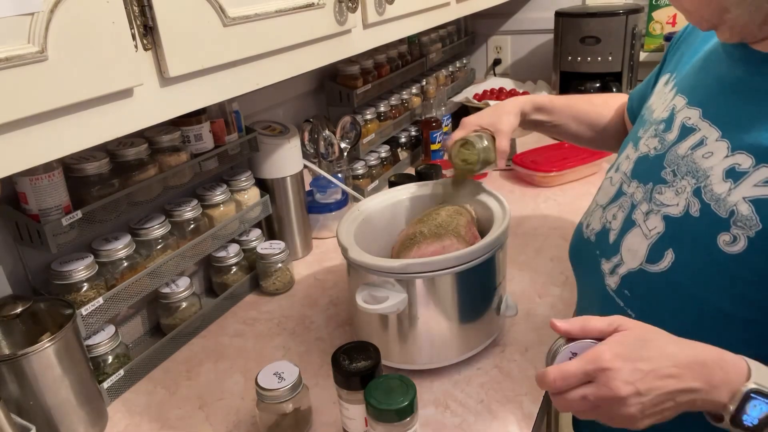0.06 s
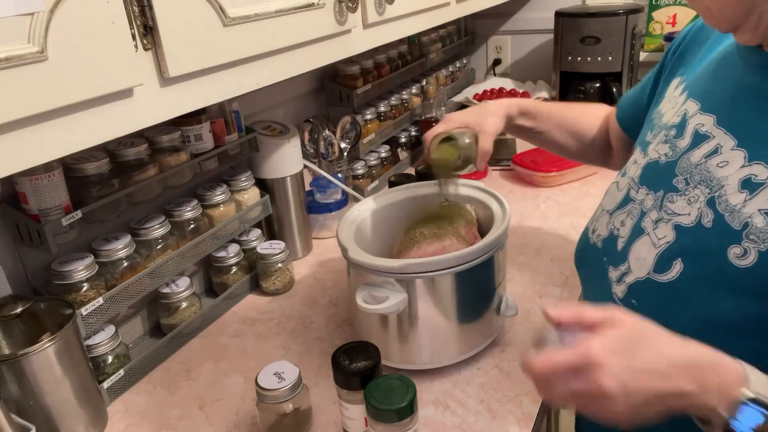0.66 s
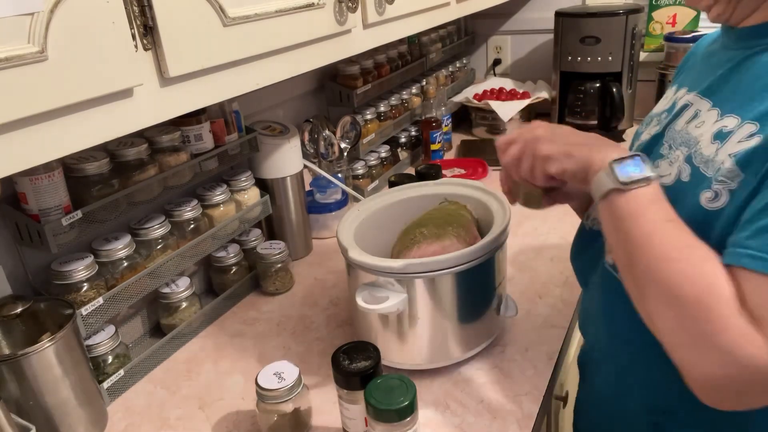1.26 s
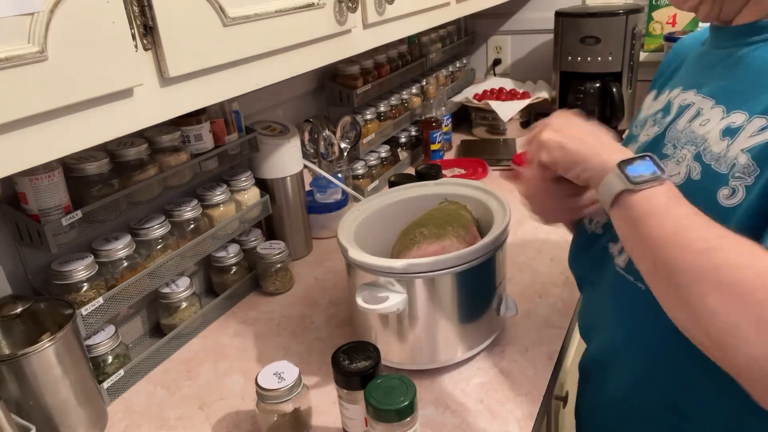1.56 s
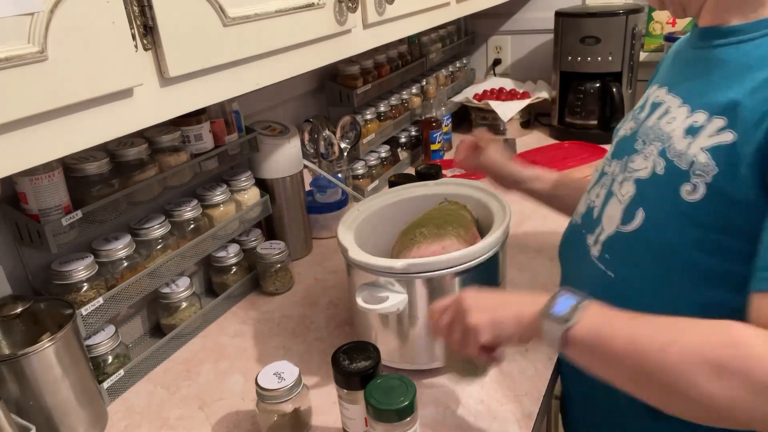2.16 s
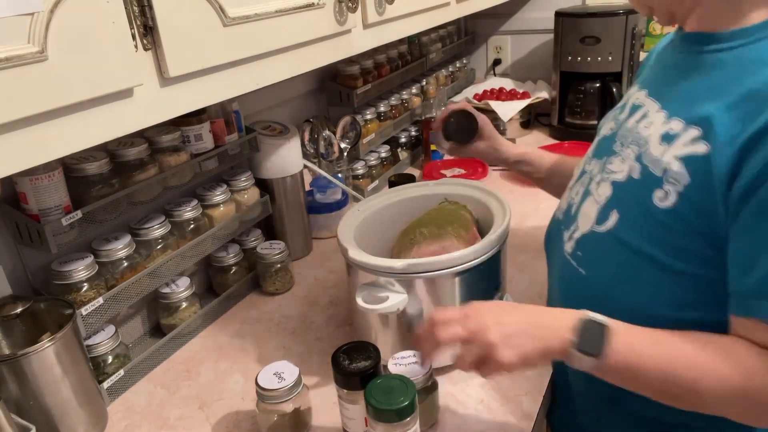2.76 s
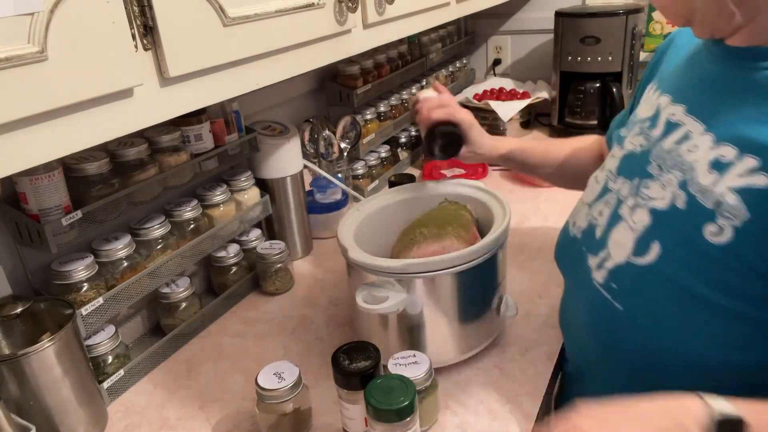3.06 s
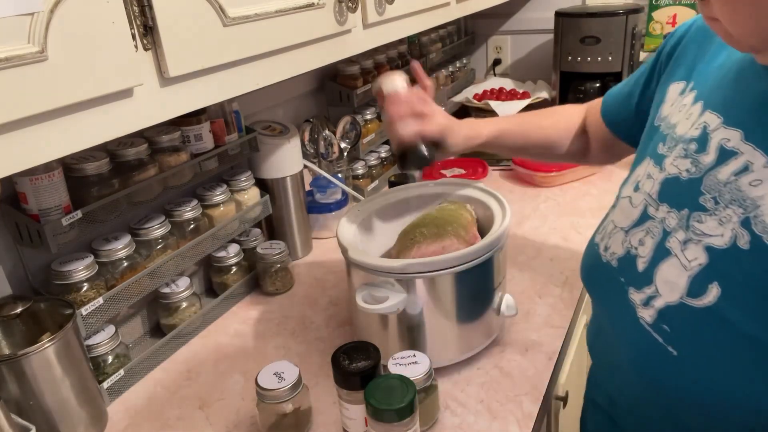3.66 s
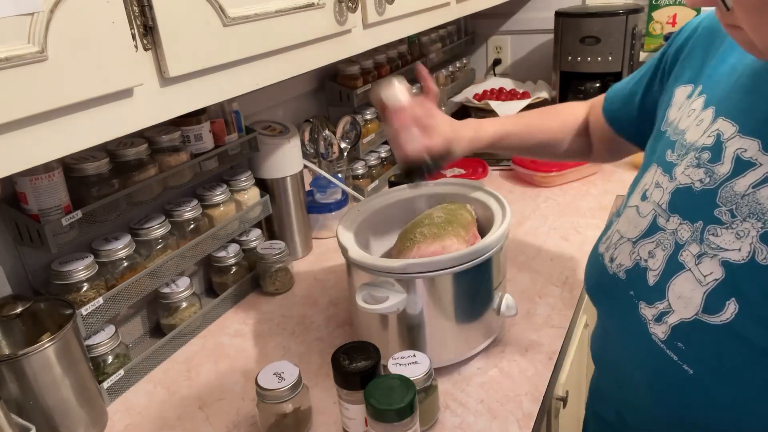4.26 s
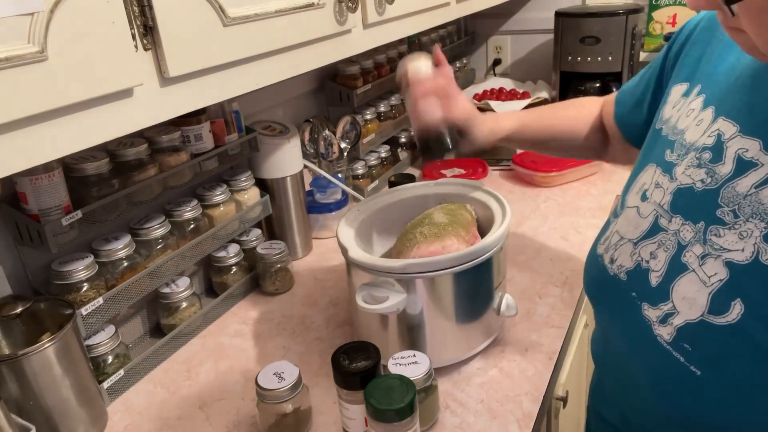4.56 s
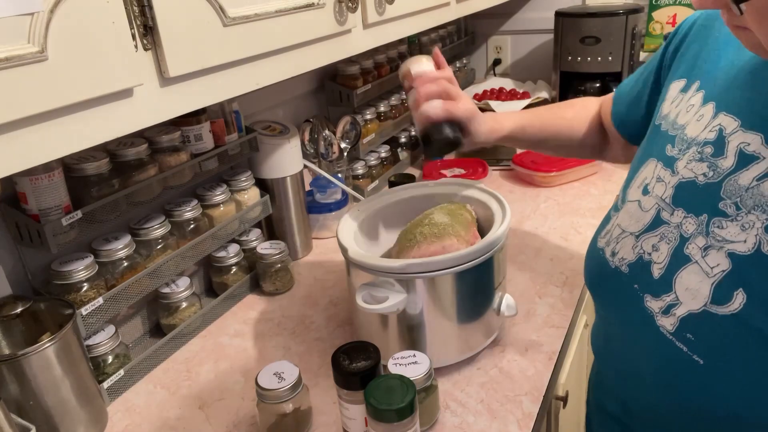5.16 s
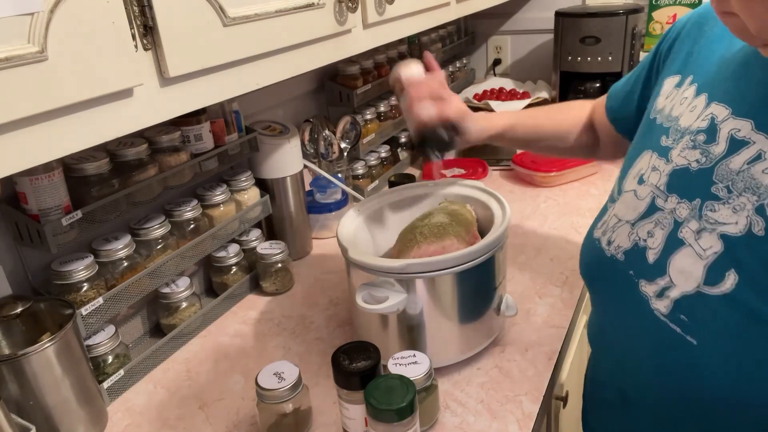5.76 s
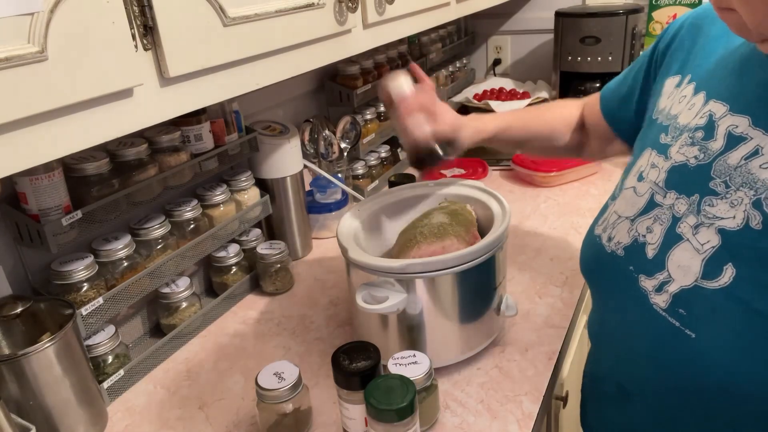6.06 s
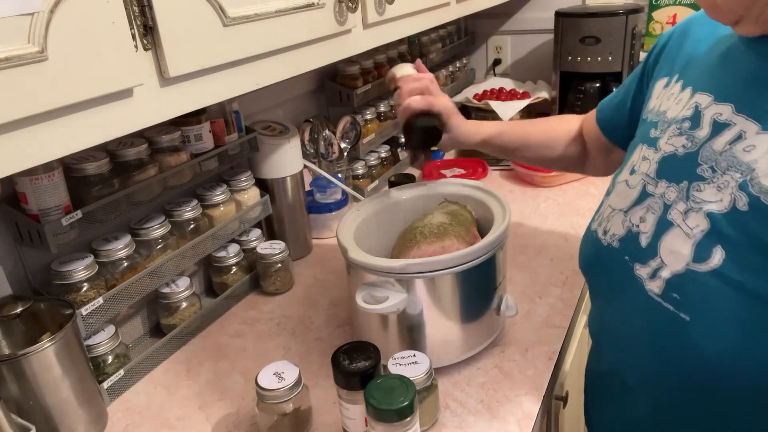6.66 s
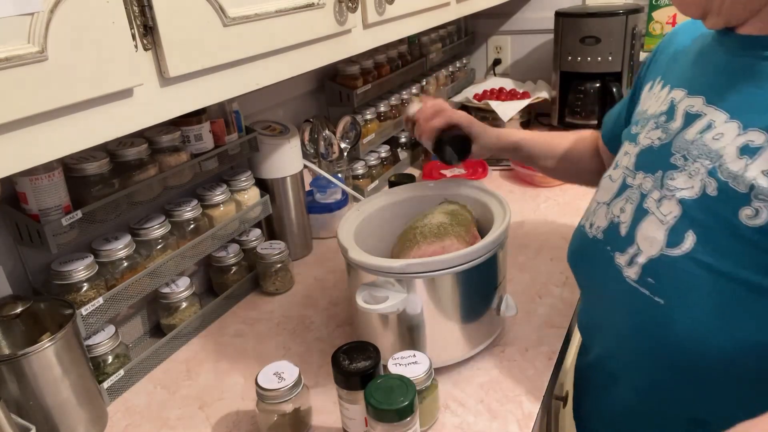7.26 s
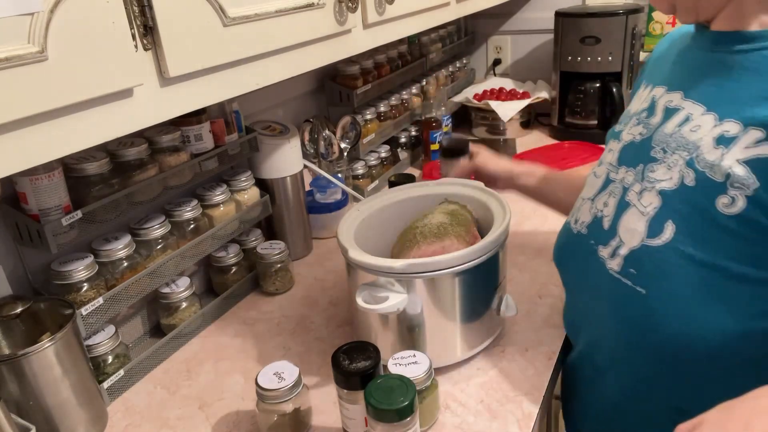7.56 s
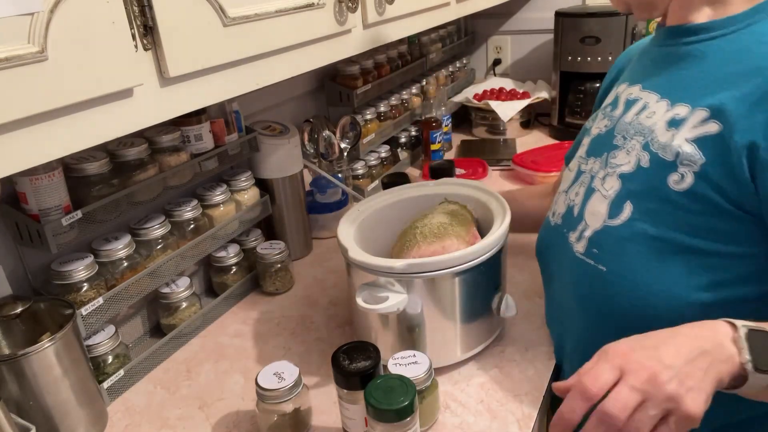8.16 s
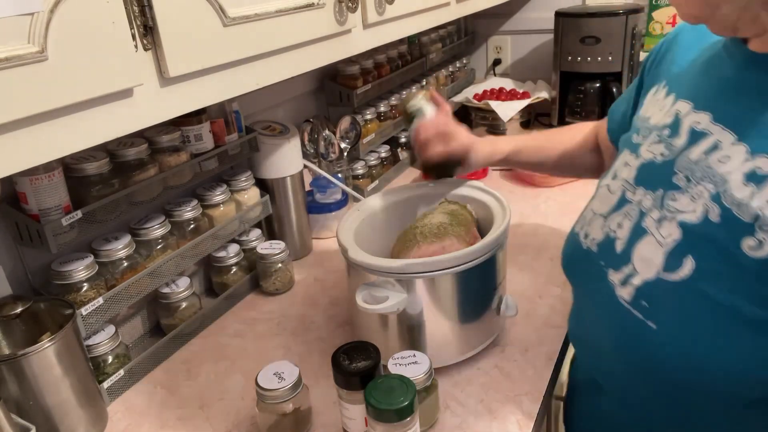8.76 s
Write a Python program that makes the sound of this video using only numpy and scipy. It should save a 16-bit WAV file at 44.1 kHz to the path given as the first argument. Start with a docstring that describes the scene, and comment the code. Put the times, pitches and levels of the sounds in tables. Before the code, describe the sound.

A metal lid clacks onto a glass spice jar, the jar is set down, then seasoning is shaken rhythmically over a pot.

```python
"""A shaker of fine seasoning is shaken over a pot in a small kitchen: grains hiss against its wall.
Before that, a metal lid clacks onto a glass spice jar and rasps down its thread, and the jar is set
on the counter close by. Near the end the shaker is put down further back, the counter panel thuds,
and the grains slide again. An appliance hums faintly over the room tone."""
import sys
import numpy as np
from scipy import signal
from scipy.fft import rfft, irfft, next_fast_len
from scipy.io import wavfile
from scipy.ndimage import uniform_filter1d, minimum_filter1d, map_coordinates

SR = 44100
rng = np.random.default_rng(int(sys.argv[2]) if len(sys.argv) > 2 else 0)


def transcribe(signal):
    """Save signal, clipped to [-1, 1], as a 16-bit WAV file at the path in sys.argv[1]."""
    frames = np.atleast_2d(signal).T
    limited = np.clip(frames, -1, 1)
    pcm = np.round(limited * 32767).astype(np.int16)
    wavfile.write(sys.argv[1], SR, pcm)


N = 397782
TIME_S = np.arange(N) / SR
AGE_S = TIME_S[:SR // 2]  # since a contact
TOP_HZ = 15780

# Shakes, a lift then a throw (throw time [s], throw level [dB], lift level [dB])
SHAKES = [(2.988, -40, -60.5), (3.179, -45, -47.5), (3.39, -40, -48.5), (3.609, -40, -46.5),
          (3.795, -43.5, -52.5), (4.036, -36, -41), (4.24, -35, -41), (4.436, -40, -42), (4.654, -36, -37),
          (4.846, -44.5, -48), (5.046, -40.5, -49.5), (5.272, -36.5, -37.5), (5.466, -40, -46.5),
          (5.694, -36, -38.5), (5.918, -39.5, -44.5), (6.131, -39.5, -42), (6.353, -37.5, -44.5),
          (6.556, -40, -46.5), (6.787, -36, -40), (6.965, -47, -50), (7.186, -43.5, -46)]
# Soft swells of hiss: grains sliding, and at 2.62 s the room's bright tail after the jar lands
# (time [s], level [dB], half width [s])
HISS_SWELLS = [(.834, -75.5, .12), (1.866, -62.5, 0.039), (2.62, -65, 0.11), (2.824, -52.5, 0.035),
               (7.379, -52, 0.054), (7.6, -52, 0.076), (7.622, -43.5, 0.016), (8.019, -65, 0.036),
               (8.376, -63.5, 0.075), (8.648, -58, .06), (8.795, -49.5, 0.018), (8.95, -54.5, 0.046)]
# Clumps hitting the shaker's end (time [s], level [dB], t60 [s])
CLUMPS = [(3.173, -42, .1), (3.950, -42.5, .12), (4.872, -47.5, .05), (5.936, -45, 0.0246),
          (6.286, -44, 0.026), (6.684, -43.5, .12), (6.897, -45.5, .07)]
# Loose grains (frequency [Hz], density [dB])
GRAIN_SPECTRUM = [(290, -30), (500, -11), (569, -24.5), (904, -17.5), (1120, -17), (1220, -13),
                  (2420, -7.5), (2710, -7.5), (3220, -7), (6090, -3), (6930, -5), (8490, 3.5),
                  (10900, -10.5), (13900, -4), (15800, -8)]
# Grains landing together (frequency [Hz], density [dB])
CLUMP_SPECTRUM = [(500, -10.5), (1300, -10.5), (1900, 0), (3200, -5), (6000, 0), (8500, -1.5), (11000, -8),
                  (16000, -12.5)]
# Shaker knocking in the hand (time [s], level [dB], pitch [Hz], t60 [s])
TAPS = [(3.174, -49, 1300, 0.0074), (4.578, -40.5, 1335, 0.0064), (4.580, -44, 825, 0.0042),
        (5.195, -53.5, 848, .005), (5.936, -54.5, 600, .0064), (6.683, -46, 1856, 0.068),
        (6.708, -48, 870, 0.01), (6.710, -39.5, 500, 0.0066)]

# Lid meeting the rim (time [s], clack [dB], ring [dB], hollow knock [dB], grain splash [dB])
LID_HITS = [(.993, -23, -28.5, -50, -24.5), (1.002, -48.5, -32, -59, -50.5),
            (1.0159, -16, -16.5, -29.5, -28.5), (1.269, -61, -55, -40, -57),
            (1.2724, -29.5, -35, -26.5, -42), (1.2883, -41.5, -41, -27, -28)]
# Metal lid (frequency [Hz], level [dB], t60 [s])
LID_MODES = [(840, -4, .06), (1203, -8, .1), (1535, -9, .1), (1615, -7, .1), (1680, -4, .09),
             (1715, 2, .16), (1800, -1, .12), (1832, -4, .14), (2400, -14, .15), (2556, -7, .3),
             (2615, -8, .15), (2652, -8, .15), (2716, -10, .22), (5437, -16, .1), (5900, -12, .2),
             (6305, -18, .12)]
# Metal striking glass (frequency [Hz], density [dB])
CLACK_SPECTRUM = [(150, -30.5), (500, -11.5), (850, -5.5), (1350, -4), (1750, 3.5), (2700, -4),
                  (3300, -12.5), (4300, -5), (5700, 2.5), (7500, -7), (8800, -6), (10500, -16.5),
                  (14400, -10.5), (16000, -21.5)]
# Hollow hand-held jar (frequency [Hz], density [dB])
HOLLOW_SPECTRUM = [(60, -11), (150, -17), (330, 3), (1000, 3), (2100, 5.5), (3000, -28), (8000, -37)]
# Thread friction (frequency [Hz], density [dB])
THREAD_SPECTRUM = [(150, -26), (400, -26.5), (750, -0.5), (1200, -6), (1700, -7), (2400, -5.5),
                   (3000, -7.5), (4300, -5), (5500, 1), (7000, -8), (8600, -5.5), (10800, -17),
                   (14200, -12), (16000, -20.5)]
# Thread catching once (time [s], pitch [Hz], level [dB])
SQUEAK = (1.447, 4080, -37)
# Rim biting on the glass (time [s], level [dB], half width [s])
RIM_BITES = [(1.462, -35.5, 0.018), (1.572, -32.5, .009), (1.599, -32, 0.011)]
# Rim friction (frequency [Hz], density [dB])
RIM_SPECTRUM = [(200, -18.5), (700, -11.5), (1300, -7.5), (1650, 5), (2200, -4.5), (3000, -23),
                (5300, -16.5), (9000, -31.5)]

# Jar touching down (time [s], body [dB], tick [dB], grain splash [dB])
JAR_HITS = [(2.3447, -56.5, -56.5, -51.5), (2.370, -20.5, -26, -48), (2.3714, -10.5, -33, -49),
            (2.3762, -11, -44.5, -51.5), (2.447, -25.5, -56, -56)]
# Jar and counter together (frequency [Hz], level [dB], t60 [s])
JAR_MODES = [(123, -10.5, 0.3), (182, -11, .1), (249.2, -22, .08), (357.7, -4.5, .14), (495, -5, 0.08),
             (542, -8.5, 0.4), (631, -14, 0.15), (776, -5.5, 0.14), (885, -4.5, .1), (1085, 4, .07),
             (1440, -10, 0.056), (1650, -10.5, .08), (2110, -15, .06)]
# Jar's dull blow (frequency [Hz], density [dB])
KNOCK_SPECTRUM = [(40, -30), (70, -20), (120, -13), (330, -6), (550, -1.5), (1000, 0), (1650, -10),
                  (2500, -16), (3300, -27), (5500, -38.5), (7000, -49), (15800, -57.5)]
# Glass on a hard top (frequency [Hz], density [dB])
TICK_SPECTRUM = [(300, -14), (1000, 6), (3300, 4), (5800, -6), (7000, -12.5), (10000, -21.5), (16000, -25)]

# Shaker bumping the far counter (time [s], boom [dB], click [dB], click cutoff [Hz], grain splash [dB])
THUDS = [(7.7006, -14.5, -26, 9000, -46.5), (7.988, -39.5, -52.5, 1200, -75), (8.007, -35, -50, 1500, -69),
         (8.1078, -29.5, -41, 4500, -62.5), (8.145, -20, -31.5, 3220, -58.5),
         (8.1947, -28.5, -39, 2600, -66)]
# Counter panel (frequency [Hz], level [dB], t60 [s])
PANEL_MODES = [(143, -11, 0.14), (172, 2.5, 0.086), (213, 9, 0.019), (259, -1.5, 0.059), (355, -6.5, 0.15),
               (414, -6.5, 0.08), (572, -23, 0.089)]
# Shaker's first touch (frequency [Hz], density [dB])
CLICK_SPECTRUM = [(60, -10), (150, 0), (550, -1.5), (1000, 0), (1600, -5.5), (2600, -10.5), (3200, -11),
                  (4800, -19.5), (8000, -23), (16000, -49.5)]

# Appliance hum (frequency [Hz], rms level [dB])
HUM_TONES = [(53.8, -62.5), (119.5, -58.5), (1292, -78), (3365, -82.5), (4194, -88.5)]
# Room tone (frequency [Hz], density [dB])
ROOM_SPECTRUM = [(15, -51.5), (30, -22), (52, 1.5), (80, -10.5), (120, -4), (150, -16.5), (190, -11),
                 (500, -24.5), (1150, -30), (1290, -25.5), (1450, -31), (4100, -39), (6500, -45),
                 (15800, -52)]
# Kitchen reverberation (frequency [Hz], t60 [s])
ROOM_DECAY = [(100, 0.46), (400, 0.43), (1000, 0.43), (2800, 0.46), (7000, 0.47), (15000, 0.33)]


def shaker(front_lead_s=0.019, front_db=-5, front_t60_s=0.11):
    """Strokes throw grains at the wall: the harder, the more collisions. The first ones land together."""
    power = sum(swell(*row) for row in strokes() + list(HISS_SWELLS))
    rate_hz = 5000 + 14000 * np.sqrt(power / power.max())
    hiss = np.sqrt(power) * colour(impacts(rate_hz, spread_db=1.5), GRAIN_SPECTRUM)
    out = amp(-1) * room(hiss, wet_db=-3)
    fronts = [(s - front_lead_s, throw_db + front_db, front_t60_s) for s, throw_db, _ in SHAKES]
    for s, db, t60_s in fronts + list(CLUMPS):
        add(out, s, amp(db) * burst(CLUMP_SPECTRUM, t60_s, wet_db=0))
    return out


def strokes(brisk_db=-36, brisk_lead_s=0.09, brisk_width_s=0.023):
    """Lifts and throws (time [s], level [dB], half width [s]). Weak ones slide longer and lead less."""
    lifts = [(s - brisk_lead_s * amp(db - brisk_db) ** 0.19, db) for s, _, db in SHAKES]
    throws = [(s, db) for s, db, _ in SHAKES]
    return [(s, db, min(brisk_width_s / amp(db - brisk_db) ** 0.4, brisk_lead_s / 2))
            for s, db in lifts + throws]


def grain_splash():
    """Seasoning jolted in a jar lands over several milliseconds."""
    return burst(GRAIN_SPECTRUM, t60_s=0.12, wet_db=-2, attack_s=0.002)


def shaker_taps():
    """The hand damps the shaker: each knock is a brief, soft blip."""
    out = np.zeros(N)
    for s, db, hz, t60_s in TAPS:
        onset = 1 - np.exp(-AGE_S * hz)  # about one cycle
        knock = unit_hit(onset * ring([(hz, 0, t60_s)], scatter_db=0))
        add(out, s, amp(db) * room(knock, wet_db=-2))
    return out


def lid_clacks():
    """The lid clacks and rings on the rim, jolting the seasoning."""
    out = np.zeros(N)
    for s, clack_db, ring_db, knock_db, splash_db in LID_HITS:
        clack = amp(clack_db) * burst(CLACK_SPECTRUM, t60_s=0.051, wet_db=-0.5, attack_s=0.0001)
        metal = amp(ring_db) * room(ring(LID_MODES, scatter_db=1.5), wet_db=-4)
        knock = amp(knock_db) * burst(HOLLOW_SPECTRUM, t60_s=0.03, wet_db=-1)
        add(out, s, clack + metal + knock + amp(splash_db) * grain_splash())
    return out


def lid_thread(start_s=1.419, end_s=1.595, attack_s=0.065, release_s=0.03, slowing_db=5.5):
    """Metal slips on glass in tiny steps and squeaks once; the lid slows and its rim bites when tight."""
    rise = np.clip((TIME_S - start_s) / attack_s, 0, 1)
    fall = np.clip(1 - (TIME_S - end_s) / release_s, 0, 1)
    tightness = np.clip(2 * (TIME_S - start_s) / (end_s - start_s) - 1, 0, 1)
    thread_gain = rise * fall * amp(-36 - slowing_db * tightness ** 2)
    rub_power = (amp(-3.5) * thread_gain) ** 2
    rim_gain = np.sqrt(rub_power + sum(swell(*bite) for bite in RIM_BITES))
    thread = thread_gain * colour(impacts(rate_hz=12000, spread_db=-1.5), THREAD_SPECTRUM)
    rim = rim_gain * colour(impacts(rate_hz=2500, spread_db=-2.5), RIM_SPECTRUM)
    stick_slip = amp(1.2 * wobble(rate_hz=70))
    s, hz, db = SQUEAK
    squeak_gain = amp(db) * np.exp(-((TIME_S - s) / 0.011) ** 2)
    squeak = squeak_gain * np.sin(2 * np.pi * hz * TIME_S + 0.6 * wobble(rate_hz=300))
    return amp(-4.5) * room(stick_slip * (thread + rim) + squeak, wet_db=-3.5)


def jar_landing():
    """The jar grazes the counter, meets it edge first and slaps flat; the seasoning settles."""
    out = np.zeros(N)
    for s, body_db, tick_db, splash_db in JAR_HITS:
        modes = amp(-5) * room(ring(JAR_MODES, scatter_db=0.5), wet_db=-4.5)
        knock = amp(-4) * burst(KNOCK_SPECTRUM, t60_s=0.036, wet_db=2)
        tick = amp(tick_db) * burst(TICK_SPECTRUM, t60_s=0.017, wet_db=-4)
        add(out, s, amp(body_db) * (modes + knock) + tick + amp(splash_db) * grain_splash())
    return out


def counter_thuds(boom_lag_s=0.00477):
    """The shaker clicks at first touch, duller if soft; the panel booms as the weight follows."""
    out = np.zeros(N)
    boom_band = signal.butter(2, [110, 520], "band", fs=SR, output="sos")
    for s, boom_db, click_db, cutoff_hz, splash_db in THUDS:
        lowpass = signal.butter(2, cutoff_hz, fs=SR, output="sos")
        click = signal.sosfilt(lowpass, burst(CLICK_SPECTRUM, t60_s=0.045, wet_db=0))
        add(out, s, amp(click_db - 3) * click + amp(splash_db) * grain_splash())
        boom = unit_hit(signal.sosfilt(boom_band, ring(PANEL_MODES, scatter_db=1)))
        add(out, s + boom_lag_s, amp(boom_db) * room(boom, wet_db=-5.5))
    return out


def background():
    """Room tone and a slightly unsteady appliance hum."""
    air = amp(-54.5) * colour(rng.standard_normal(N), ROOM_SPECTRUM)
    hum = sum(amp(db) * np.sqrt(2) * np.sin(2 * np.pi * hz * TIME_S + 0.37 * wobble(rate_hz=9.5))
              for hz, db in HUM_TONES)
    return air + hum


def burst(spectrum, t60_s, wet_db, attack_s=0.00065):
    """Dense, fast-dying vibration of one contact, with echoes of the same colour."""
    direct, diffuse = [colour(noise, spectrum) for noise in rng.standard_normal((2, len(AGE_S)))]
    envelope = (1 - np.exp(-(AGE_S / attack_s) ** 2)) * amp(-60 * AGE_S / t60_s)
    return unit_hit(direct * envelope) + amp(wet_db) * unit_hit(echoes(diffuse))


def ring(modes, scatter_db):
    """Decaying modes, struck with random sign and scattered strength."""
    out = np.zeros(len(AGE_S))
    for hz, db, t60_s in modes:
        sign = rng.choice([-1, 1])
        envelope = amp(db + scatter_db * rng.normal() - 60 * AGE_S / t60_s)
        out += sign * envelope * np.sin(2 * np.pi * hz * AGE_S)
    return unit_hit(out)


def impacts(rate_hz, spread_db):
    """Tiny random collisions of uneven size; mean power is independent of rate."""
    chance = np.clip(rate_hz / SR, 1e-4, 1)
    hits = (rng.random(N) < chance) * rng.standard_normal(N)
    return hits * amp(spread_db * rng.standard_normal(N)) / np.sqrt(chance)


def room(x, wet_db):
    """x plus echoes, their pattern redrawn every 1/8 s as for a moving source."""
    out, size = x.copy(), SR // 8
    for start in range(0, len(x), size):
        piece = x[start:start + size]
        if np.abs(piece).max() > 1e-5:
            response = echoes(rng.standard_normal(len(AGE_S)))
            add(out, start / SR, amp(wet_db) * signal.fftconvolve(piece, response))
    return out


def echoes(noise, build_s=0.002):
    """Noise shaped into a unit-energy kitchen tail; the top treble dies first."""
    hz, age_s, bins = signal.stft(noise, SR, nperseg=256)
    decay = amp(-60 * age_s / log_interp(ROOM_DECAY, hz)[:, None])
    tail = signal.istft(bins * decay, SR, nperseg=256)[1][:len(AGE_S)]
    tail *= 1 - np.exp(-(AGE_S / build_s) ** 2)
    return tail / np.linalg.norm(tail)


def swell(s, db, half_width_s):
    """Gaussian power envelope centred on time s."""
    reach = round(4 * half_width_s * SR)
    offset_s = np.arange(-reach, reach) / SR
    power = np.zeros(N)
    add(power, s + offset_s[0], amp(db) ** 2 * np.exp(-(offset_s / half_width_s) ** 2))
    return power


def colour(x, spectrum):
    """x shaped by a spectrum, at rms 1."""
    size = next_fast_len(len(x))
    gain = amp(log_interp(spectrum, np.fft.rfftfreq(size, 1 / SR)))
    shaped = irfft(rfft(x, size) * gain, size)[:len(x)]
    return shaped / np.sqrt(np.mean(shaped ** 2) + 1e-20)


def log_interp(points, hz):
    """(frequency [Hz], value) points read on a log axis."""
    knots_hz, values = np.transpose(points)
    return np.interp(np.log(hz + 1), np.log(knots_hz + 1), values)


def wobble(rate_hz):
    """Smooth curve through random knots."""
    return map_coordinates(rng.standard_normal(int(N * rate_hz / SR) + 4), [TIME_S * rate_hz])


def unit_hit(x):
    """x with the energy of 10 ms at rms 1."""
    return x * np.sqrt(SR / 100) / np.linalg.norm(x)


def amp(db):
    """Decibels to gain."""
    return 10 ** (np.asarray(db) / 20)


def add(track, s, sound):
    """Mix sound into track at time s."""
    part = track[round(s * SR):][:len(sound)]
    part += sound[:len(part)]


def scene():
    """All sources, mono."""
    handling = shaker() + shaker_taps() + lid_clacks() + lid_thread() + jar_landing() + counter_thuds()
    return (handling + background())[None]


def record(dry):
    """Fast peak limiter, then a brick-wall lowpass at TOP_HZ."""
    needed_gain = np.minimum(1, 0.92 / (np.abs(dry) + 1e-9))
    limited = dry * uniform_filter1d(minimum_filter1d(needed_gain, size=129), size=129)
    size = next_fast_len(N + SR // 2)
    passband = np.fft.rfftfreq(size, 1 / SR) < TOP_HZ
    return irfft(rfft(limited, size) * passband, size)[:, :N]


dry = scene()
out = record(dry)
transcribe(out)
```